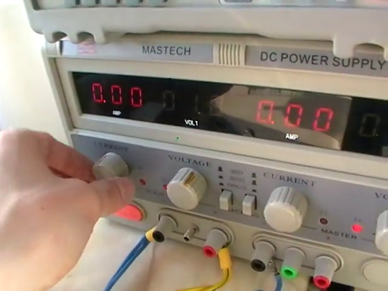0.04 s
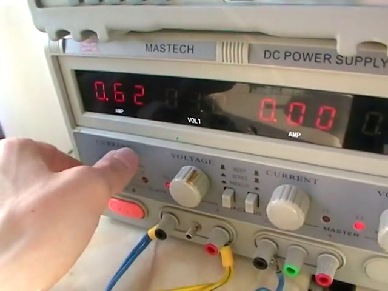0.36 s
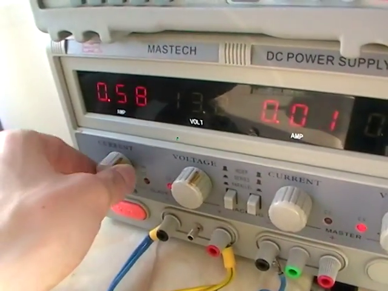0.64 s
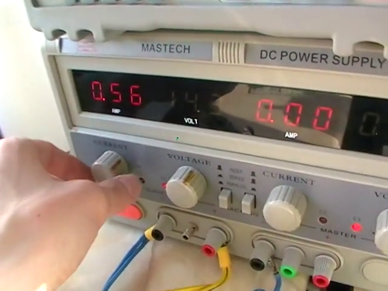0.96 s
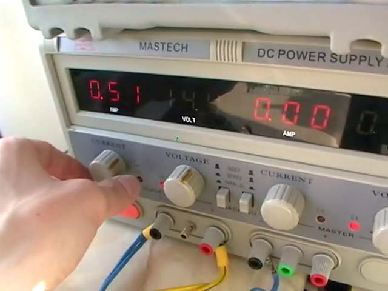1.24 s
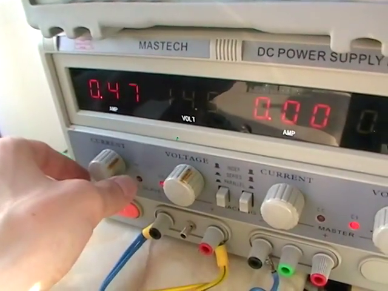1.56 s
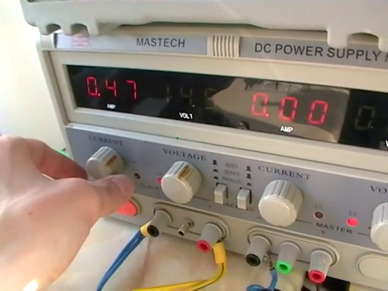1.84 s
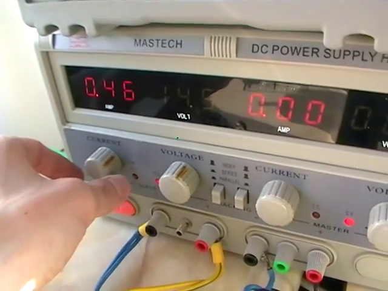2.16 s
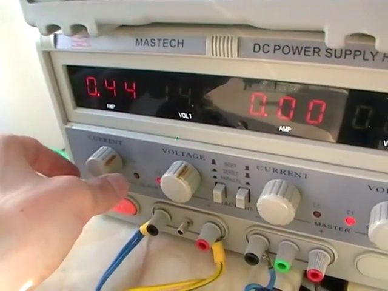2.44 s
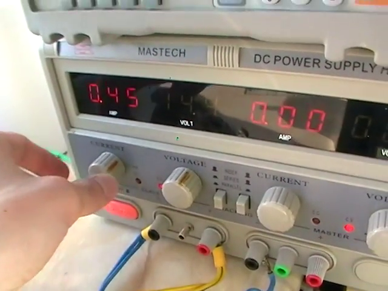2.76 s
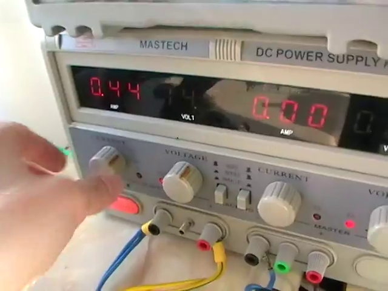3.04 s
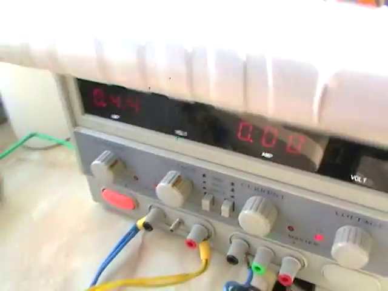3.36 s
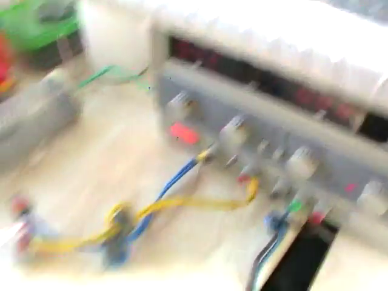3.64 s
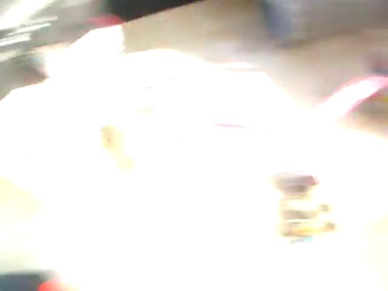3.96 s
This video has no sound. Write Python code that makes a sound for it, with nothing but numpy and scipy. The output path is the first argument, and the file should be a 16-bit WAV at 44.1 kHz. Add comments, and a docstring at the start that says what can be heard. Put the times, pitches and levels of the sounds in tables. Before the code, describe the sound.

Sharp electric sparks snap about ten times a second after a switch click.

```python
"""A switch clicks over a faint fan hum, then a spark igniter snaps about ten times a second.
Each spark cracks, echoes round a small room and knocks the camera's microphones into a low thump.
The first sparks overload the microphones and limiter; they weaken as the voltage is turned down.
Underneath, the cooling fan slows and spins back up, and a hand rumbles on the camera."""
import sys
import numpy as np
from scipy import signal
from scipy.fft import rfft, irfft
from scipy.io import wavfile
from scipy.ndimage import uniform_filter1d, minimum_filter1d

SR = 44100
rng = np.random.default_rng(int(sys.argv[2]) if len(sys.argv) > 2 else 0)


def transcribe(signal):
    """Save signal, clipped to [-1, 1], as a 16-bit WAV file at the path in sys.argv[1]."""
    frames = np.atleast_2d(signal).T
    limited = np.clip(frames, -1, 1)
    pcm = np.round(limited * 32767).astype(np.int16)
    wavfile.write(sys.argv[1], SR, pcm)


N = 176400
TIME = np.arange(N) / SR
AGE = np.arange(int(.3 * SR)) / SR  # seconds since a click or spark began

# How alike left and right are in clicks and sparks: f/Hz, likeness (1 same, -1 opposite)
SNAP_LIKENESS = [(100, -1.22), (700, 0.3), (1300, 0.3), (2400, 0.77), (4400, 1), (6000, 1), (9000, 1),
                 (12000, 0.38), (15000, -0.045)]
# The same for moving air and rumble: f/Hz, likeness
AIR_LIKENESS = [(60, -0.64), (150, 0.38), (350, 0.74), (1000, 0.76), (8000, 1)]


def amp(db):
    """Turns decibels into a gain."""
    return 10 ** (np.asarray(db) / 20)


def unit(x):
    """Scales a sound to an average power of 1."""
    return x / np.sqrt(np.mean(x ** 2) + 1e-20)


def read(points, hz):
    """Looks up frequencies in a table, giving each octave equal room."""
    f, value = np.transpose(points)
    return np.interp(np.log(hz + 1), np.log(f + 1), value)


def fade(t, t60):
    """Stays at 1 until t = 0, then dies away by 60 dB every t60 seconds."""
    return np.exp(-np.log(1000) * np.maximum(t, 0) / t60)


def add(mix, start_s, sound):
    """Mixes a stereo sound in at its start time."""
    part = mix[:, round(start_s * SR):][:, :sound.shape[1]]
    part += sound[:, :part.shape[1]]


def noise(colour, likeness, size):
    """Stereo noise with a given colour (level at each frequency) and left-right likeness."""
    hz = np.fft.rfftfreq(size, 1 / SR)
    mid, side = rfft(rng.standard_normal((2, size)))
    alike = np.clip(read(likeness, hz), -.99, .99)
    mid, side = mid * np.sqrt(1 + alike), side * np.sqrt(1 - alike)
    return unit(irfft(np.array([mid + side, mid - side]) * amp(read(colour, hz)), size))


def burst(colour, envelope):
    """A puff of noise whose shape and energy follow the envelope."""
    return unit(noise(colour, SNAP_LIKENESS, len(AGE)) * envelope) * np.sqrt(np.mean(envelope ** 2))


def shortest_click(colour):
    """The tightest click that has a given colour."""
    log_gain = np.log(amp(read(colour, abs(np.fft.fftfreq(len(AGE), 1 / SR)))))
    return np.fft.ifft(np.exp(np.conj(signal.hilbert(log_gain)))).real


def fan():
    """Spinning blades hum a slightly wavering note in a bed of moving air."""
    # The blades' note: t/s, f/Hz, level/dB
    blade_note = [(0, 297, -61), (.25, 295, -64), (.6, 245, -71), (.95, 265, -61), (1.25, 315, -59),
                  (1.5, 346, -61), (1.75, 364, -61.5), (2, 377, -60.5), (2.5, 386, -58.5), (3.4, 393, -61),
                  (4, 393, -69)]
    # Colour of the air and room rumble: f/Hz, level/dB
    air_colour = [(25, -5), (70, -3.5), (150, -7.5), (300, -3), (500, 2), (800, -8), (1500, -5),
                  (2800, -13.5), (4500, -17.5), (7000, -23.5), (15000, -31)]
    # Loudness of the air: t/s, level/dB
    air_level = [(0, -52.5), (.24, -51.5), (.45, -52), (1.4, -57.5), (2.5, -53), (3.3, -57), (4, -55)]
    times, hz, db = np.transpose(blade_note)
    waver = .005 * unit(uniform_filter1d(rng.standard_normal(N), size=3000))
    cycles = np.cumsum(np.interp(TIME, times, hz) * (1 + waver)) / SR
    hum = amp(np.interp(TIME, times, db)) * unit(np.sin(2 * np.pi * cycles))
    air = amp(np.interp(TIME, *np.transpose(air_level))) * noise(air_colour, AIR_LIKENESS, N)
    return hum + air


def hand_rumble(lumps_db=0.5):
    """A hand rubs on the camera, mostly while reaching for the switch and the voltage knob."""
    # Colour of the rumble: f/Hz, level/dB
    colour = [(25, -13), (65, 4.5), (130, -4.5), (260, -2), (600, -20), (1500, -40), (8000, -60)]
    # Loudness of the rumble: t/s, level/dB
    level = [(0, -50), (.25, -52), (.75, -53), (1.1, -63), (1.4, -81), (3.3, -75), (4, -75)]
    lumps = unit(uniform_filter1d(rng.standard_normal(N), size=2500))
    db = np.interp(TIME, *np.transpose(level)) + lumps_db * lumps
    return amp(db) * noise(colour, AIR_LIKENESS, N)


def switch(click_t60=.014, room_db=-21, room_t60=0.16):
    """The power supply's switch ticks as it is pressed, then its spring snaps over and bounces."""
    # The clicks: t/s, tick level/dB, spring level/dB
    clicks = [(0.1014, -18, -45), (0.1038, -15.5, -42), (0.1332, -24, -9.5), (.1362, -25, -15),
              (0.141, -26, -43)]
    # Colour of the broad tick: f/Hz, level/dB
    tick = [(200, -12), (700, -11), (1200, -8), (2200, -14), (3500, -10), (4900, -5), (5600, -10),
            (7000, -2), (8300, 0), (11000, -6), (15500, -15)]
    # Colour of the ringing spring: f/Hz, level/dB
    spring = [(200, -24), (3000, -31.5), (6000, -34), (7400, -9), (8300, -6), (9300, -6), (10400, -23),
              (11600, -10), (13000, -23), (15000, -38)]
    out = np.zeros((2, N))
    envelope = fade(AGE, click_t60) + amp(room_db) * fade(AGE, room_t60)
    for start_s, tick_db, spring_db in clicks:
        click = amp(tick_db) * burst(tick, envelope) + amp(spring_db) * burst(spring, envelope)
        add(out, start_s, click)
    return out


def thump(hz, rise_s=.0007, fade_s=0.0013, knock_hz=603, knock_t60=0.0038, knock_db=4.5):
    """The blast swings the two microphones in nearly opposite ways and knocks the camera body."""
    # Boost of each microphone: left/dB, right/dB
    sides_db = (0.2, 1.53)
    phase = rng.normal(0, .35) + np.array([[2.39], [0]])  # radians, left and right
    swing_shape = (1 - np.exp(-(AGE / rise_s) ** 2)) * np.exp(-AGE / fade_s)
    swing = swing_shape * np.sin(2 * np.pi * hz * AGE + phase)
    knock_shape = (1 - np.exp(-AGE * knock_hz * 2)) * fade(AGE, knock_t60)
    knock = amp(knock_db) * knock_shape * np.sin(2 * np.pi * knock_hz * AGE + phase)
    bass_cut = signal.butter(1, 37, "high", fs=SR)
    return 2 * amp(sides_db)[:, None] * signal.lfilter(*bass_cut, swing + knock)


def crack(hold_s=0.0017, t60=0.0036, scatter_db=7.5, evenness=.75):
    """The arc arrives as a tight cluster of uneven clicks, and the spark gap's holder rings briefly."""
    # Colour of the crack: f/Hz, level/dB
    colour = [(100, -32), (700, -21), (1100, -21), (1500, -15), (2300, -14), (3200, -19), (4100, -18),
              (4800, -7), (5900, -6), (7000, -9), (8800, -9), (10000, -1), (11200, -4), (12500, -8),
              (13500, 0), (15500, -9)]
    # Notes of the holder: f/Hz, level/dB, time to fade by 60 dB/s
    holder_notes = [(1379, -20, 0.012), (2070, -24.5, 0.012)]
    sizes = amp(scatter_db * rng.standard_normal(len(AGE))) * fade(AGE - hold_s, t60)
    spectrum = rfft(noise([(0, 0), (SR, 0)], SNAP_LIKENESS, len(AGE)) * sizes)
    spectrum /= (abs(spectrum) ** 2).mean(0) ** (evenness / 2)  # evens out the cluster's own colour
    snap = irfft(spectrum * rfft(shortest_click(colour)), len(AGE))
    snap *= fade(AGE - 2 * hold_s, 2 * t60)
    holder = sum((-1) ** k * amp(db) * unit(np.sin(2 * np.pi * hz * AGE) * fade(AGE, note_t60))
                 for k, (hz, db, note_t60) in enumerate(holder_notes))
    return (unit(snap) + holder) * np.sqrt(hold_s / AGE[-1])


def crack_and_room(echo_s=0.0071, echo_width_s=0.0021, echo_db=2.5, tail_db=-.5):
    """Two sounds: the direct crack, and its echoes off bench and wall with the room's fading tail."""
    # Colour of the echoes: f/Hz, level/dB
    colour = [(100, -19), (700, -19.5), (1050, -25), (1500, -16.5), (2200, -14.5), (3500, -16.5),
              (4800, -15.5), (5500, -1.5), (6100, -5.5), (7000, -7), (9000, -9), (9750, 1), (11000, -5.5),
              (12500, -5), (13600, 0.5), (15500, -5)]
    # How long the room rings: f/Hz, time to fade by 60 dB/s
    room_t60 = [(300, 0.057), (1500, 0.25), (5500, 0.2), (10000, 0.17), (15000, .16)]
    echo = burst(colour, amp(echo_db) * np.exp(-.5 * ((AGE - echo_s) / echo_width_s) ** 2))
    hz, t, bands = signal.stft(noise(colour, SNAP_LIKENESS, len(AGE)), SR, nperseg=256)
    bands *= fade(t, read(room_t60, hz)[:, None])
    tail = signal.istft(bands, SR, nperseg=256)[1][:, :len(AGE)]
    return np.array([crack(), echo + amp(tail_db) * tail])


def sparks(ring_db=-12, ring_t60=0.21, thump_boost_db=3, camera_moves_s=3.2):
    """Each spark cracks, echoes, rings and thumps; the echoes stay much alike until the camera moves."""
    # The sparks: t/s, strength/dB, relative crack level/dB, relative thump level/dB, thump f/Hz
    events = [(0.2412, -3, 6.5, -10, 324), (0.3565, -6.5, 6.5, -16.5, 420), (0.4759, -4, 7, -17, 444),
              (0.594, -5, 5, 1, 250), (0.707, -4.5, 6, -5.5, 480), (0.8107, -9, 6.5, -1.5, 278),
              (0.9005, -9, 7, -6, 475), (0.9933, -9.5, 8, -11.5, 480), (1.0881, -12, 8, -4, 263),
              (1.1836, -13.5, 8.5, -7, 270.0), (1.2766, -13, 8.5, -14, 222), (1.372, -14.5, 9, -10, 355),
              (1.466, -16, 9, -9.5, 403), (1.561, -16.5, 10, -16, 370), (1.6515, -16.5, 9.5, -19, 370.0),
              (1.7469, -19, 4, -13, 312), (1.8404, -18.5, 4.5, -14, 378), (1.9362, -19, 6, -15.5, 315),
              (2.0303, -18.5, 4, -14, 297), (2.1238, -18.5, 4, -19.5, 390.0), (2.2191, -18.5, 4, -11, 403),
              (2.3129, -19, 3, -18.5, 356), (2.406, -17.5, 5.5, -16, 292), (2.4987, -18, 5, -18, 302),
              (2.593, -22.5, 1.5, -34, 430.0), (2.6876, -15.5, 9, -19, 330), (2.7824, -19.5, 7, -14, 296),
              (2.8763, -20, 5.5, -17, 304), (2.9701, -19.5, 7, -18, 313), (3.0625, -19.5, 3.5, -27, 370.0),
              (3.1576, -19, 5.5, -16, 390), (3.25, -19.5, 5, -16, 270.0), (3.3445, -20, 5.5, -32, 390),
              (3.4388, -20, -1, -9, 306), (3.5325, -19, 0, -9.5, 337), (3.6274, -20, 1, -9.5, 353),
              (3.7216, -20, -2, -6.5, 338), (3.815, -20.5, 1, -1, 254), (3.9087, -19, 1.5, -4, 243)]
    # High notes that ring on after each spark: f/Hz, relative level/dB
    ring_notes = [(5413, -4), (5531, -3), (5698, -5), (5937, -2), (6049, -2), (6361, -5), (7353, -7),
                  (9549, -2), (9737, -1), (9888, 0), (10120, -5), (10474, -4), (13490, -3), (13716, -3)]
    out = np.zeros((2, N))
    usual = crack_and_room()
    chord = unit(sum(amp(db) * np.sin(2 * np.pi * (hz * AGE + rng.random())) for hz, db in ring_notes))
    ring = amp(ring_db) * chord * fade(AGE, ring_t60)
    for start_s, strength_db, crack_db, thump_db, thump_hz in events:
        new_share = 1 if start_s > camera_moves_s else 0.16
        direct, room = np.sqrt(1 - new_share) * usual + np.sqrt(new_share) * crack_and_room()
        low = amp(thump_boost_db + thump_db) * thump(thump_hz)
        add(out, start_s, amp(strength_db) * (amp(crack_db) * direct + room + ring + low))
    return out * amp([[.5], [-.5]])  # a little to the left


def scene():
    """Switch, sparks, fan and hand rumble together."""
    return switch() + sparks() + fan() + hand_rumble()


def record(dry, limit_db=-9.5, window_s=0.0021, hold_s=0.038, recover_db_per_s=306, ceiling=0.78):
    """A limiter turns loud sparks down, holds and recovers; peaks are rounded and the top treble cut."""
    power = uniform_filter1d((dry ** 2).mean(0), int(window_s * SR))
    over_db = np.maximum(10 * np.log10(abs(power) + 1e-12) - limit_db, 0)
    half_hold = int(hold_s * SR / 2)
    held_db = -minimum_filter1d(-over_db, 2 * half_hold + 1, origin=half_hold)  # biggest recent excess
    recovery_db = TIME * recover_db_per_s
    cut_db = np.maximum.accumulate(held_db + recovery_db) - recovery_db
    rounded = ceiling * np.tanh(dry * amp(-cut_db) / ceiling)
    treble_cut = signal.firwin(255, 15850, window=("kaiser", 9), fs=SR)
    return signal.oaconvolve(rounded, treble_cut[None], "same")


dry = scene()
out = record(dry)
transcribe(out)
```